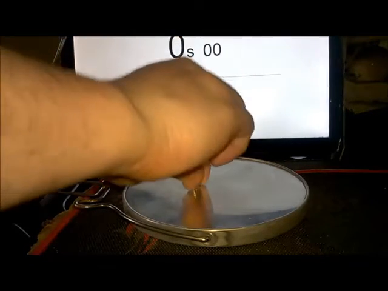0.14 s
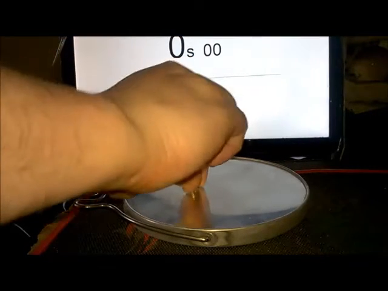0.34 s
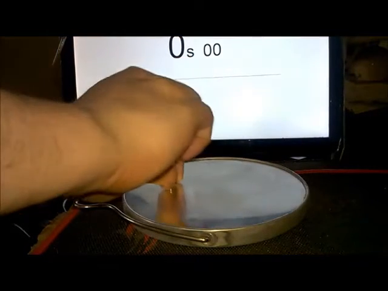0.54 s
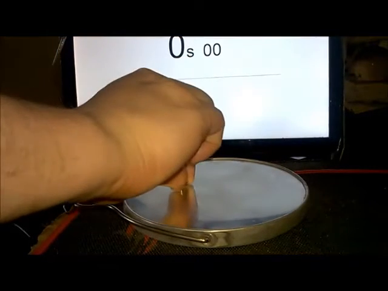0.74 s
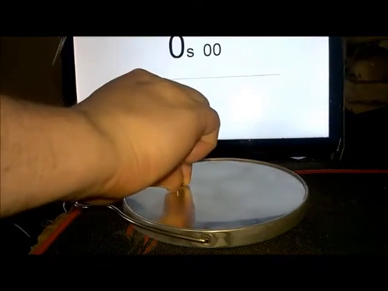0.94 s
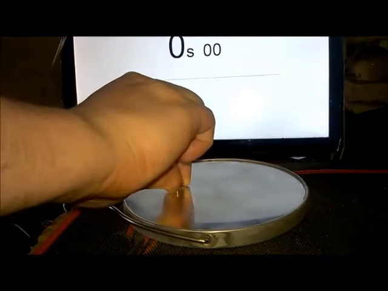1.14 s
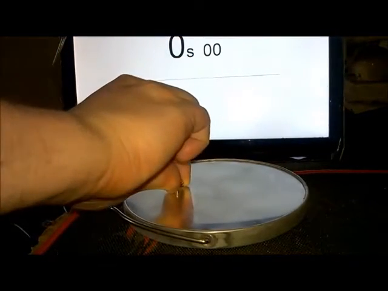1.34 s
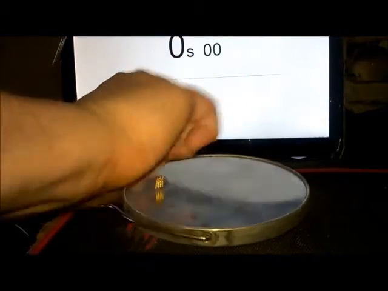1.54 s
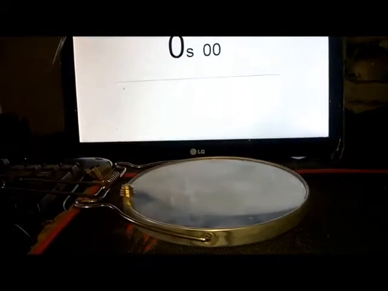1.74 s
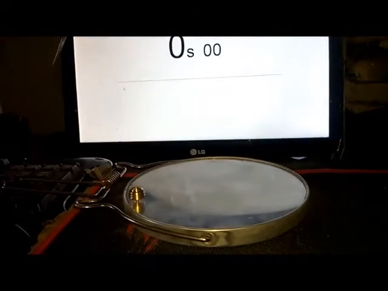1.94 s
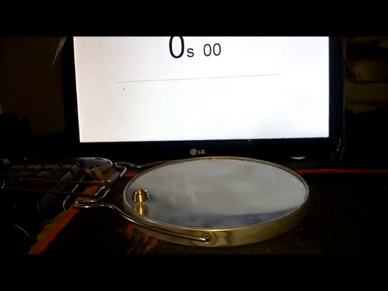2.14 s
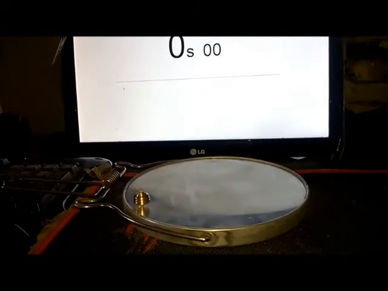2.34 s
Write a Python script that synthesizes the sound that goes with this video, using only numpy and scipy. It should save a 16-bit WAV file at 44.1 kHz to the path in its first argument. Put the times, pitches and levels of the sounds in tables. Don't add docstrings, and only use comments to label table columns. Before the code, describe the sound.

A small metal top lands hard on a glass mirror, skids and chatters in a fast bright rattle, ticks the metal rim and stops; quiet room, faint fan hum and hiss, close microphone.

```python
import sys
import numpy as np
from scipy import signal
from scipy.fft import rfft, irfft
from scipy.io import wavfile
from scipy.ndimage import uniform_filter1d

SR = 44100
rng = np.random.default_rng(int(sys.argv[2]) if len(sys.argv) > 2 else 0)


def decibels_to_gain(level_db):
    exponent = np.asarray(level_db, float) / 20
    return 10 ** exponent


def log_audio(samples):
    frames = np.atleast_2d(samples).T
    limited = np.clip(frames, -1, 1)
    pcm = np.round(limited * 32767).astype(np.int16)
    wavfile.write(sys.argv[1], SR, pcm)


N = 109456

# pitch in Hz, level in dB per Hz.
FLOOR_SHAPE = [(20, -21.5), (53, 0.5), (228, -3), (600, -9), (2700, -12), (3700, -16), (5500, -15),
               (16000, -23.5)]
# start in seconds, level in dB.
CREAKS = [(1.035, -44), (1.2735, -45), (1.3414, -43.5), (1.7445, -52), (2.215, -56)]
# pitch in Hz, width in Hz, level in dB, loudest moment in seconds, spread in seconds.
SPIN_HUM = [(2200, 250, -73, 2.03, .1), (2600, 300, -72, 2.0, .09), (4150, 150, -72, 1.98, .06),
            (4850, 150, -73, 2.06, .04), (5600, 900, -72, 2.38, .03)]
# start in seconds, level in dB, pitch in Hz, ring time in seconds, thud in dB.
TICKS = [
    (0.4133, -39, 2580, .015, -23),
    (0.4135, -47.5, 1430, 0.018, -35),
    (.4128, -45.5, 5260, 0.011, -38),
    (1.7600, -7.5, 5500, 0.0013, -12.5),
    (1.7671, -11, 5440, 0.0069, -10),
]
# time in seconds, level in dB.
CHATTER_LEVEL = [
    (1.542, -32.5),
    (1.548, -17.5),
    (1.562, -18),
    (1.57, -25.5),
    (1.586, -34),
    (1.62, -29.5),
    (1.75, -35),
    (1.795, -33.5),
    (1.825, -64),
]
# start in seconds, level in dB, contact length in ms, thud in dB.
LANDING = [
    (1.5276, -30, .4, 0),
    (1.5330, -2, .1, -22),
    (1.5341, -1, .1, -22),
    (1.5437, -12, .11, -14),
    (1.5465, -11, .1, -14),
    (1.5585, -16, .1, -14),
    (1.5645, -15, .12, -14),
]
# start in seconds, level in dB, contact length in ms, thud in dB.
BOUNCES = [(1.5885, -5.5, .11, -12), (1.6069, -5.5, .11, -10), (1.6185, -8, .11, -7),
           (1.6256, -16, .12, -8), (1.6300, -19, .11, -8), (1.6373, -11.5, .11, -9), (1.6470, -16, .12, -8),
           (1.6520, -21, .12, -8), (1.6589, -12.5, .12, -9), (1.6700, -13.5, .12, -8),
           (1.6800, -16, .12, -8), (1.6900, -17, .12, -8), (1.7000, -21, .13, -7), (1.7095, -21, .13, -7),
           (1.7198, -22, .13, -7), (1.7298, -25, .13, -6), (1.7450, -31, .14, -4), (1.7625, -32, .2, 8),
           (1.7772, -19, .13, -3), (1.7920, -31, .12, -8)]
# pitch in Hz, level in dB, time to fall 60 dB in seconds.
GLASS_MIDDLE = [(1010, -7, 0.088), (1518, -7, 0.015), (1924, -9.5, 0.033), (3210, 9.5, 0.0067),
                (4090, -14, 0.025), (4804, 10.5, 0.0099), (5810, -2.5, 0.013), (6630, -4.5, .02),
                (7560, 0, 0.043), (8624, -10, 0.095), (10900, -18, .05), (10310, -7.5, .07),
                (12600, -8, .04), (15500, -9.5, .07)]
# pitch in Hz, level in dB, time to fall 60 dB in seconds.
GLASS_EDGE = [(800, -11.5, 0.036), (1020, -5, 0.01), (1572, -6.5, 0.016), (1995, -5.5, 0.0082),
              (2330, -12, 0.022), (3292, 0.5, 0.0057), (4540, -0.5, 0.0082), (4845, -1, 0.014),
              (5330, -1, 0.012), (6570, -5, .015), (7520, -8.5, 0.016), (8780, -15.5, 0.033),
              (10220, -15, 0.011), (12900, -26, 0.0123)]
# pitch in Hz, level in dB, time to fall 60 dB in seconds.
FRAME = [(420, -9.5, 0.018), (549, -0.5, .045), (700, -19, .025), (595, -19, .035), (860, -7, .03)]
REBOUNDS_S = (.0007, .0015, .0025)
REBOUNDS_DB = (-8, -6, -9)

FLOOR_DB, FLOOR_WANDER_DB = -61, 1
JOLT_S, JOLT_DB = 1.5275, -39
ROOM_DB, ROOM_T60_S, ROOM_DULL_HZ, ROOM_GAP_S = -13.5, .12, 7800, .009
CHATTER_DB, CHATTER_PER_S, CHATTER_SPREAD_DB, CHATTER_THUD_DB = -23, 4600, 3, -11.5
CHATTER_MS, TICK_MS = .046, .094
LEAVES_MIDDLE_S, SCRAPE_DB = 1.587, 10
SPOT_DB, SPOT_DETUNE = 2, .015
CRACK_DB, CRACK_T60_S, CRACK_HZ = -12, .018, (1200, 9000)
THUD_DB = -2
LOW_CUT_HZ, DULL_HZ = 338, 12000
TOP_HZ = 15850


def ring(force, hz, t60):
    decay = np.log(1000) / (max(t60, 1e-3) * SR)
    pole = np.exp(2j * np.pi * min(hz, SR / 2.2) / SR - decay)
    return signal.lfilter([1], [1, -pole], force).imag


def modes(force, table):
    return sum((-1) ** k * decibels_to_gain(db) * ring(force, hz, t60) for k, (hz, db, t60) in enumerate(table))


def push(ms):
    progress = (np.arange(64) + .5) / max(ms * SR / 1000, 1)
    bump = np.sin(np.pi * np.clip(progress, 0, 1)) ** 2
    return np.pad(bump / bump.sum(), (0, 8000))


def add(out, s, sound):
    at = int(s * SR)
    out[at:at + len(sound)] += sound[:N - at]


def gritty(x):
    return gritty_filter(2, x)


def gritty_filter(order, x):
    return signal.lfilter(*signal.butter(order, CRACK_HZ, "band", fs=SR), x)


def fan_and_hiss():
    hz = np.fft.rfftfreq(N, 1 / SR) + 1
    shape_hz, shape_db = np.array(FLOOR_SHAPE).T
    shape = decibels_to_gain(np.interp(np.log(hz), np.log(shape_hz), shape_db))
    noise = rfft(rng.standard_normal(N)) * shape
    low = 1 / (1 + (hz / 500) ** 2)
    wander = uniform_filter1d(rng.standard_normal(N), size=4000)
    wander = uniform_filter1d(wander, size=4000)
    rumble = irfft(noise * low, N) * decibels_to_gain(FLOOR_WANDER_DB * wander / wander.std())
    hiss = irfft(noise * (1 - low), N)
    out = rumble + hiss
    return decibels_to_gain(FLOOR_DB) * out / out.std()


def flick_jolt():
    out, force = np.zeros(N), push(.5)
    jolt = ring(force, 135, .05) + .7 * ring(force, 80, .08) + .5 * ring(force, 40, .15)
    add(out, JOLT_S, decibels_to_gain(JOLT_DB) * jolt)
    return out


def creaks():
    out = np.zeros(N)
    for s, db in CREAKS:
        add(out, s, decibels_to_gain(db) * ring(push(.03), 12000, .00086))
    return out


def band(hz, width):
    y = ring(rng.standard_normal(N), hz, np.log(1000) / (np.pi * width))
    return y / y.std()


def spin_hum(t):
    out = np.zeros(N)
    for hz, width, db, loudest, spread in SPIN_HUM:
        swell = np.exp(-.5 * ((t - loudest) / spread) ** 2)
        out += decibels_to_gain(db) * band(hz, width) * swell
    return out


def room(x):
    t = np.arange(SR // 2) / SR
    tail = rng.standard_normal(len(t)) * decibels_to_gain(-60 * t / ROOM_T60_S) * (1 - np.exp(-t / ROOM_GAP_S))
    tail = signal.lfilter(*signal.butter(1, ROOM_DULL_HZ, fs=SR), tail)
    response = decibels_to_gain(ROOM_DB) * tail / np.sqrt(np.sum(tail ** 2))
    response[0] += 1
    return signal.fftconvolve(x, response)[:N]


def ticks():
    out, force = np.zeros(N), push(TICK_MS)
    for s, db, hz, t60, thud_db in TICKS:
        tones = [(.34 * hz, -10, t60), (.75 * hz, -4, t60), (hz, 0, t60), (1.235 * hz, -4, t60)]
        thud = decibels_to_gain(thud_db) * modes(force, FRAME)
        add(out, s, decibels_to_gain(db - 3.5) * (modes(force, tones) + thud))
    return out


def chatter(t):
    chance, size = rng.random((2, N))
    knocks = (chance < CHATTER_PER_S / SR) * decibels_to_gain(-CHATTER_SPREAD_DB * np.log(size + 1e-9))
    times, levels = np.array(CHATTER_LEVEL).T
    level = decibels_to_gain(CHATTER_DB + np.interp(t, times, levels, -120, -120))
    knocks = knocks * rng.choice([-1, 1], N) * level
    knocks = np.convolve(knocks, push(CHATTER_MS)[:64])[:N]
    early = t < LEAVES_MIDDLE_S
    glass = modes(knocks * early, GLASS_MIDDLE) + modes(knocks * ~early, GLASS_EDGE)
    scrape = decibels_to_gain(SCRAPE_DB) * gritty_filter(1, knocks)
    return scrape + glass + decibels_to_gain(CHATTER_THUD_DB) * modes(knocks, FRAME)


def contacts(rows, glass):
    out, spots = np.zeros(N), rng.standard_normal((len(rows), 3, 14))
    grit = gritty(rng.standard_normal(N))
    for (s, db, ms, thud_db), (weigh, tune, late) in zip(rows, spots):
        knock = push(ms)
        force = knock.copy()
        for lag, rebound_db, u in zip(REBOUNDS_S, REBOUNDS_DB, late):
            force += decibels_to_gain(rebound_db) * np.roll(knock, int(lag * SR * (1 + .1 * u)))
        here = [(hz * (1 + SPOT_DETUNE * d), g + SPOT_DB * w, t60)
                for (hz, g, t60), w, d in zip(glass, weigh, tune)]
        bright = modes(force, here)
        age = np.arange(len(force)) / SR
        crack = grit[int(s * SR):][:len(force)] * decibels_to_gain(CRACK_DB - 60 * age / CRACK_T60_S)
        bright = bright / np.abs(bright).max() + crack
        thud = decibels_to_gain(thud_db + THUD_DB) * modes(knock, FRAME)
        add(out, s, decibels_to_gain(db) * (bright / np.abs(bright).max() + thud))
    return out


def scene():
    t = np.arange(N) / SR
    quiet = fan_and_hiss() + flick_jolt() + creaks() + spin_hum(t)
    top = ticks() + chatter(t) + contacts(LANDING, GLASS_MIDDLE) + contacts(BOUNCES, GLASS_EDGE)
    top = room(top)
    top = signal.sosfilt(signal.butter(4, LOW_CUT_HZ, "high", fs=SR, output="sos"), top)
    top = signal.sosfilt(signal.butter(3, DULL_HZ, fs=SR, output="sos"), top)
    return (quiet + top)[None]


def low_pass(x):
    return signal.sosfilt(signal.butter(12, 16500, fs=SR, output="sos"), x)


def record(dry):
    soft = 1.1 * np.tanh(dry / 1.1)
    mix = signal.sosfilt(signal.ellip(8, .2, 70, TOP_HZ, fs=SR, output="sos"), soft)
    return low_pass(mix)


dry = scene()
out = record(dry)
log_audio(out)
```